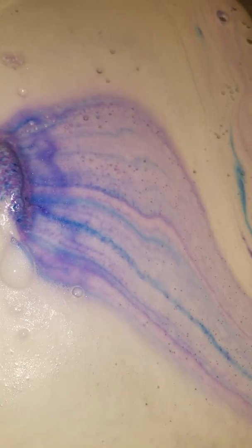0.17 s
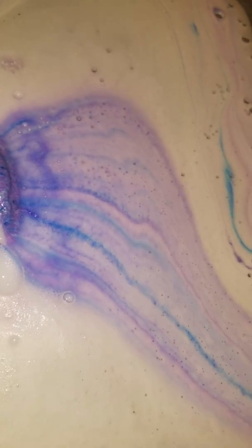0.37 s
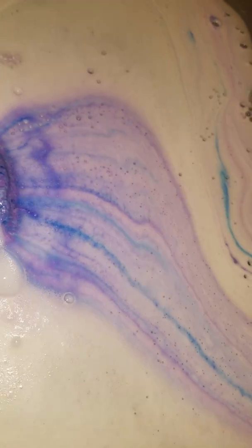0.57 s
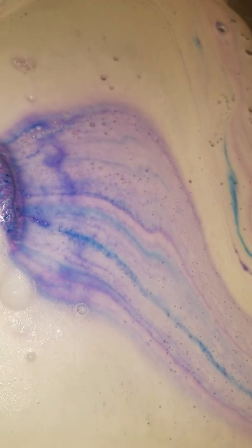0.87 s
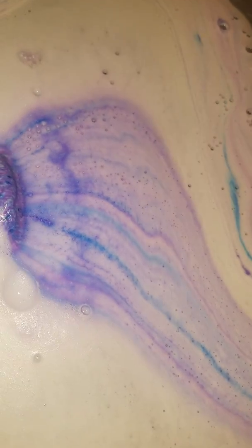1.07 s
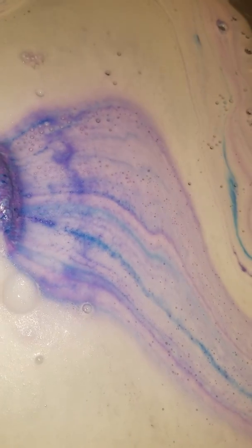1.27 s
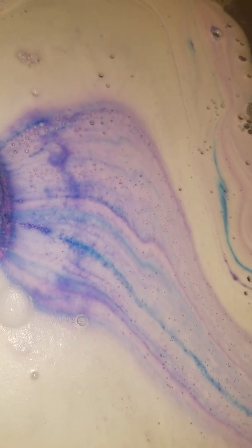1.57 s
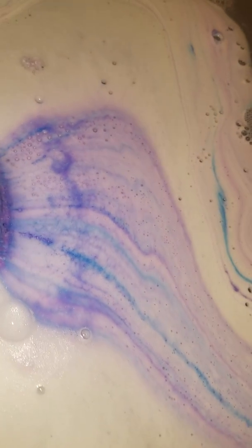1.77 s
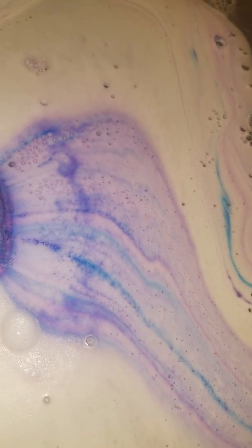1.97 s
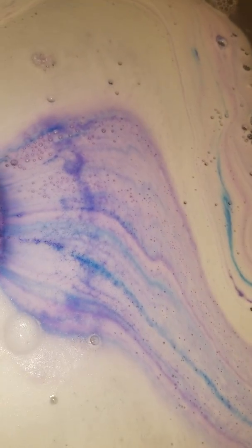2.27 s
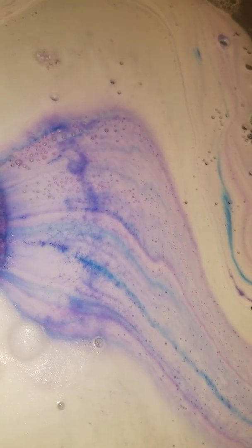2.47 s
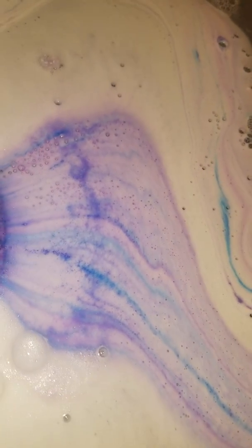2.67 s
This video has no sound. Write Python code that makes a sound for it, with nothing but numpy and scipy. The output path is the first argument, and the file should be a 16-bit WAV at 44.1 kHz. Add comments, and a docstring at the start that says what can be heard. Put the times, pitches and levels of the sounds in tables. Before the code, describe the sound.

A bath bomb fizzes very softly in bath water, a thin crackling hiss over a low fan rumble; near the end one bubble plops with a quick upward chirp, close up in a hard-walled bathroom.

```python
"""Bath bomb in a filled tub

Faint fizz: random clicks and smooth hiss, coloured together. Late on, a bubble plops with a quick upward chirp
(gliding sines) and a few small ones burst with ticks (banded noise snaps); a few fainter ticks come earlier.
Echo taps and decaying noise tails stand for the hard walls of tub and room.
Beneath lie the ventilation's low rumble and hum, both shaped noise."""
import sys
import numpy as np
from scipy import signal
from scipy.fft import rfft, irfft
from scipy.io import wavfile

SR = 44100
rng = np.random.default_rng(int(sys.argv[2]) if len(sys.argv) > 2 else 0)


def waveform_to_disk(signal):
    """Save audio, clipped to [-1, 1], as 16-bit WAV at the path in sys.argv[1]."""
    frames = np.transpose(np.atleast_2d(signal))
    scaled = np.clip(frames, -1, 1) * 32767
    samples = np.round(scaled).astype(np.int16)
    wavfile.write(sys.argv[1], SR, samples)


N = 124362


def amp(db):
    """Decibels to gain."""
    return 10 ** (np.asarray(db) / 20)


def unit(x):
    """Scales to rms 1 over all channels."""
    return x / np.sqrt(np.mean(x ** 2) + 1e-20)


def read(points, hz):
    """Joins points by straight lines on a log-frequency axis."""
    point_hz, value = np.transpose(points)
    return np.interp(np.log(hz + 1), np.log(point_hz + 1), value)


def pan(db):
    """Left and right gains for a left-minus-right level difference."""
    return amp(np.array([[.5], [-.5]]) * db)


def add(mix, start_s, sound):
    """Mixes a sound in at a start time, cut at the end of the mix."""
    part = mix[:, max(round(start_s * SR), 0):][:, :sound.shape[1]]
    part += sound[:, :part.shape[1]]


def colour(x, spectrum, balance):
    """Gives a stereo signal a spectrum and a balance, at rms 1."""
    hz = np.fft.rfftfreq(N, 1 / SR)
    gain = amp(read(spectrum, hz)) * pan(read(balance, hz))
    return unit(irfft(rfft(x) * gain, N))


def fizz():
    """Countless tiny bubbles burst as single-sample clicks of either sign over a smooth hiss."""
    # Each row: frequency in Hz, relative level in dB per Hz.
    fizz_spectrum = [(1500, -21), (4000, -10), (7500, -15), (10000, -14), (12000, -10), (15500, -5.5)]
    # Each row: frequency in Hz, left minus right in dB.
    fizz_balance = [(4000, -5.5), (8000, -1), (9500, 3.5), (11000, 0), (15500, 4)]
    hiss_db, pops_db = -66.5, -74
    pops_per_s, spread_db = 2600, -1

    happens = rng.random((2, N)) < pops_per_s / SR
    pops = happens * rng.choice([-1, 1], (2, N))
    pops = pops * amp(spread_db * np.minimum(rng.exponential(1, (2, N)), 4))
    pops = unit(pops + room(pops))
    hiss = rng.standard_normal((2, N))
    mix = amp(hiss_db) * hiss + amp(pops_db) * pops
    total_gain = np.hypot(amp(hiss_db), amp(pops_db))
    return total_gain * colour(mix, fizz_spectrum, fizz_balance)


def plops():
    """Ringing bubbles: each swells, settles on its end pitch, and fades at a rate set by its glide time."""
    # Each row: start in seconds, level in dB, start pitch in Hz, end pitch in Hz, glide time in seconds,
    # left minus right in dB.
    bubbles = [(2.3351, -31.5, 1350, 820, .0025, -2), (2.3413, -22.8, 1285, 2095, .0058, .5),
               (2.4965, -52.5, 2950, 3200, .0045, -4), (2.5132, -46, 2540, 2680, .0032, 1)]
    swell_glides, fade_db_per_glide = .52, -5.8
    right_lag_s = .00032  # the plops reach the left microphone first
    room_db = -5.5

    out = np.zeros((2, N))
    t = np.arange(SR // 20) / SR
    for start_s, db, start_hz, end_hz, glide_s, side_db in bubbles:
        glides = t / glide_s
        pitch_hz = end_hz + (start_hz - end_hz) * np.exp(-glides ** 2)
        tone = np.sin(2 * np.pi * np.cumsum(pitch_hz) / SR)
        swell = np.sin(np.pi / 2 * np.minimum(glides / swell_glides, 1)) ** 2
        fade_db = fade_db_per_glide * np.maximum(glides - swell_glides, 0)
        plop = amp(db + fade_db) * swell * tone * pan(side_db)
        add(out[:1], start_s, plop[:1])
        add(out[1:], start_s + right_lag_s, plop[1:])
    return out + tub(out) + amp(room_db) * room(out)


def ticks():
    """Surface films burst: brief noise in one band, then tub and room answer."""
    # Each row: time of envelope peak in seconds, level before the envelope in dB, centre in Hz,
    # half-width in octaves, length (twice the rise time) in seconds, left minus right in dB, echo send in dB.
    films = [(.612, -63, 5200, 0.3, 0.00082, -4, -8), (1.286, -64, 13000, .4, 0.0017, .5, -5),
             (2.2744, -39.5, 14700, 0.26, 0.0012, 5, -1.5), (2.2756, -53.5, 8000, 1, 0.0016, -3, -2),
             (2.3368, -52.5, 4430, 0.34, 0.00083, -5, 0.5), (2.3368, -66, 9500, .4, .0008, -2, -6),
             (2.489, -54.5, 4640, 0.41, 0.0018, -5, -1), (2.5152, -46.5, 10100, 0.14, 0.0013, 2, -2),
             (2.5150, -52, 11000, 1, 0.0014, -4, 3), (2.5157, -56.5, 4300, .2, .002, -6, 2.5)]
    splash_t60_s, splash_db = 0.18, -3.5  # dense early echoes inside the tub
    room_db = -6.5

    dry, send = np.zeros((2, 2, N))
    t, hz = np.arange(1024) / SR, np.fft.rfftfreq(1024, 1 / SR)
    for peak_s, db, centre_hz, half_octaves, length_s, side_db, echo_db in films:
        band = 1 / (1 + (np.log2((hz + 1) / centre_hz) / half_octaves) ** 6) ** .5
        noise = unit(irfft(rfft(rng.standard_normal((2, len(t)))) * band))
        rises = 2 * t / length_s
        envelope = rises * np.exp(1 - rises)
        snap = amp(db) * pan(side_db) * noise * envelope
        add(dry, peak_s - length_s / 2, snap)
        add(send, peak_s, amp(echo_db) * snap)
    splash = room(send, [(1, splash_t60_s)])
    return dry + amp(splash_db) * splash + amp(room_db) * room(send)


def tub(x):
    """Early echoes off the tub walls: delayed copies of either sign."""
    # Each row: delay in seconds, signed gain.
    left_echoes = [(.00326, -.19), (.00524, .22), (.0096, .29), (.01866, -.34), (.03773, .18), (.068, .08)]
    right_echoes = [(.00097, -.6), (.00254, -.5), (.00412, .27), (.0186, -.27), (.02526, -.4), (.068, .1)]
    out = np.zeros((2, N))
    for side, echoes in enumerate([left_echoes, right_echoes]):
        for delay_s, gain in echoes:
            add(out[side:side + 1], delay_s, gain * x[side:side + 1])
    return out


def room(x, t60=None):
    """A short diffuse tail of noise, each band dying at its own speed."""
    # Each row: frequency in Hz, time to fall 60 dB in seconds.
    room_t60 = [(500, 0.22), (1400, 0.28), (1850, 0.28), (2150, 0.33), (2700, .22), (5000, 0.21),
                (10000, 0.37), (16000, 0.33)]
    delay_s = .0015
    if t60 is None:
        t60 = room_t60
    hz, t, bins = signal.stft(rng.standard_normal((2, SR // 2)), SR, nperseg=256)
    decay = amp(-60 * t / read(t60, hz)[:, None])
    tail = signal.istft(bins * decay, SR, nperseg=256)[1]
    tail = tail / np.linalg.norm(tail[0])
    out = np.zeros((2, N))
    add(out, delay_s, signal.fftconvolve(x, tail, axes=1))
    return out


def ventilation():
    """Steady broadband rumble plus hum tones: noise in narrow bands, so each wavers."""
    # Each row: frequency in Hz, relative level in dB per Hz.
    rumble_spectrum = [(12, -33), (28, -18.5), (43, -15), (57, -22.5), (76, 1.5), (90, -0.5), (104, -5.5),
                       (135, -1.5), (178, -3), (215, -12), (265, -6), (350, -9.5), (420, -17.5),
                       (530, -17.5), (720, -20), (1100, -21), (1450, -29.5), (2000, -33.5), (2900, -38),
                       (3800, -46), (6000, -54.5), (9000, -80), (16000, -80)]
    # Each row: frequency in Hz, left minus right in dB.
    rumble_balance = [(40, 1), (85, 0.5), (150, -0.5), (280, -6), (450, 0.5), (700, -0.5), (1500, -.5),
                      (3000, -3), (6000, -2.5), (9000, 2)]
    # Each row: frequency in Hz, level before panning in dB, width in Hz, left minus right in dB.
    hum_tones = [(118.6, -46, 9, -1.5), (154.8, -49, 23.4, -3), (301.7, -56.5, 3.5, -2),
                 (358.5, -55, 9.3, -5.5), (404.3, -58.5, 11, -7.5), (474.6, -63, 18, -3),
                 (712, -67.5, 7, -14.5), (855.7, -68.5, 10.5, -16.5), (1016.5, -68.5, 15, -9.5),
                 (1071, -61.5, 10.3, 1.5), (2593, -79, 47, -17)]
    rumble_db = -39.5

    out = amp(rumble_db) * colour(irfft(air(), N), rumble_spectrum, rumble_balance)
    hz = np.fft.rfftfreq(N, 1 / SR)
    drive = air()
    for tone_hz, db, width_hz, side_db in hum_tones:
        band = 1 / (1 + ((hz - tone_hz) / width_hz * 2) ** 4) ** .5
        out += amp(db) * pan(side_db) * unit(irfft(drive * band, N))
    return out


def air():
    """Spectra of white noise at two microphones: alike in the bass, mostly less so higher up."""
    # Each row: frequency in Hz, left-right likeness from -1 to 1.
    likeness = [(40, 1), (150, 0.97), (270, 1), (380, 0.33), (450, 0.59), (560, -0.82), (740, 0.63),
                (1000, 0.0068), (1350, -0.41), (2000, 0.17), (8000, -0.41)]
    a, b = rfft(rng.standard_normal((2, N)))
    same = np.clip(read(likeness, np.fft.rfftfreq(N, 1 / SR)), -1, 1)
    return np.array([a, same * a + np.sqrt(1 - same ** 2) * b])


def scene():
    """Fizz, larger bubbles and ventilation together."""
    return fizz() + plops() + ticks() + ventilation()


def record(dry):
    """The recorder's band limit: a linear-phase low-pass."""
    edge_hz = 15800
    taps = signal.firwin(601, edge_hz, window=("kaiser", 8), fs=SR)
    return signal.oaconvolve(dry, taps[None], "same")


dry = scene()
out = record(dry)
waveform_to_disk(out)
```